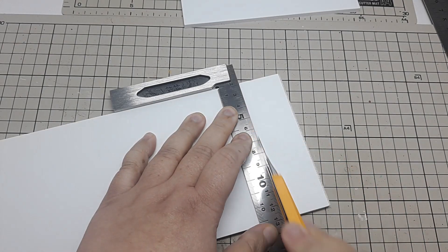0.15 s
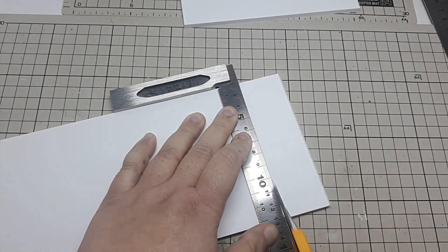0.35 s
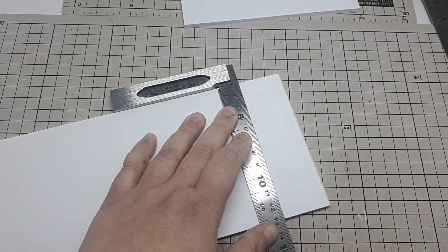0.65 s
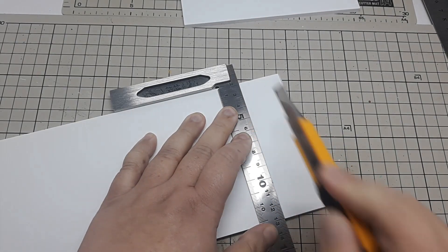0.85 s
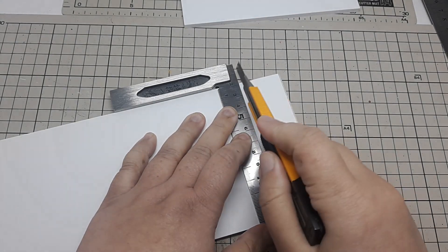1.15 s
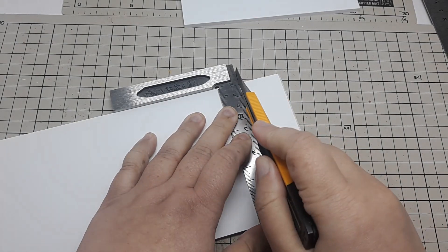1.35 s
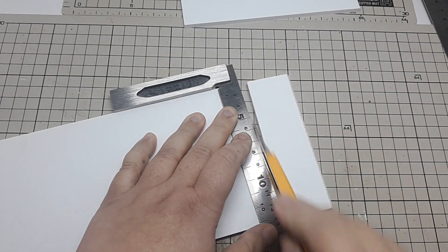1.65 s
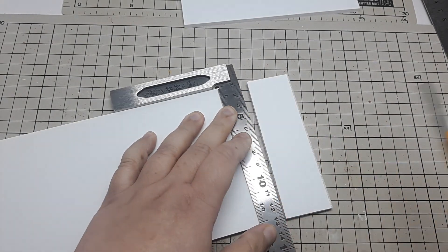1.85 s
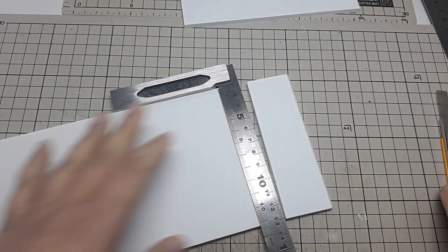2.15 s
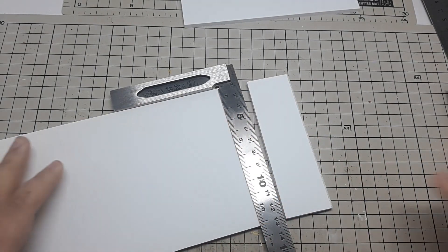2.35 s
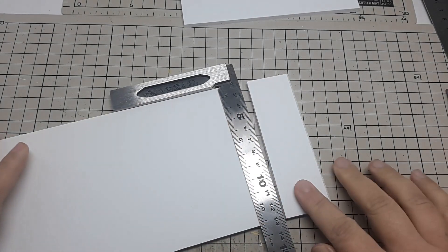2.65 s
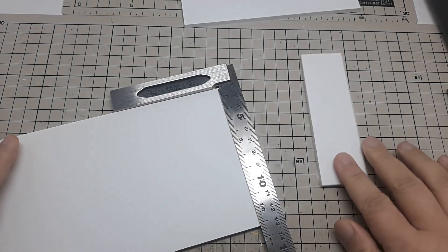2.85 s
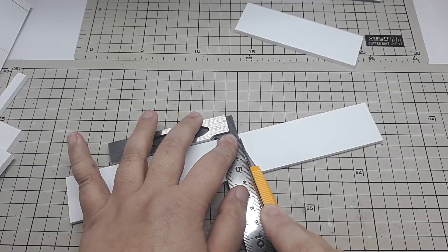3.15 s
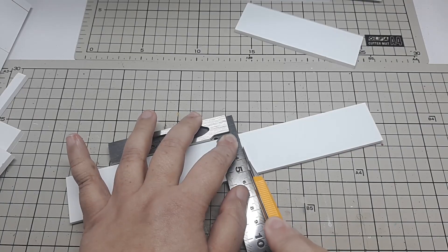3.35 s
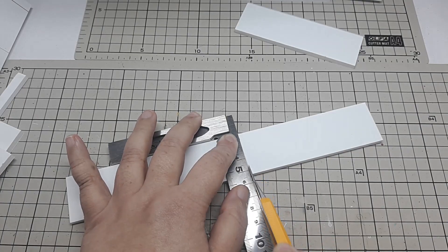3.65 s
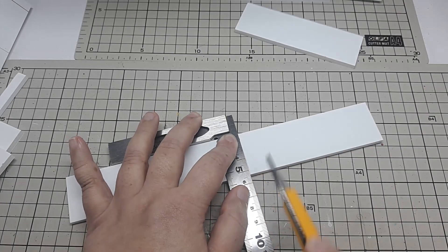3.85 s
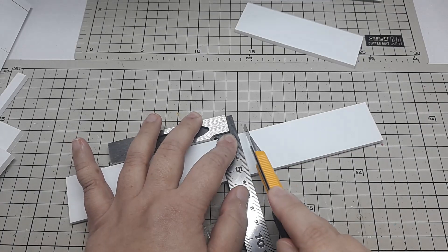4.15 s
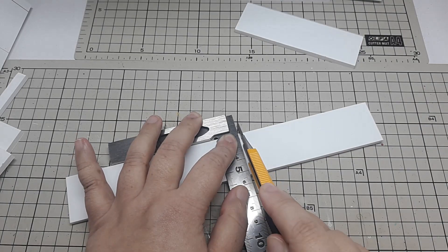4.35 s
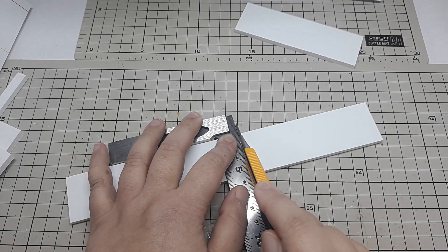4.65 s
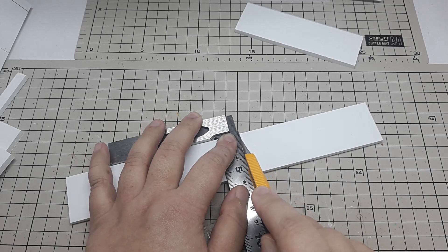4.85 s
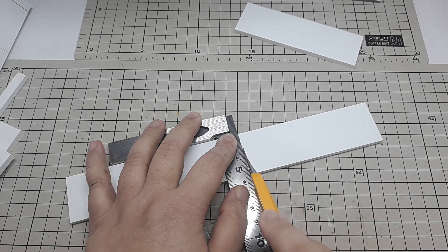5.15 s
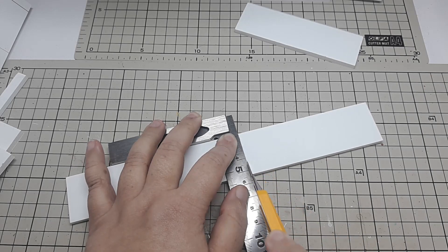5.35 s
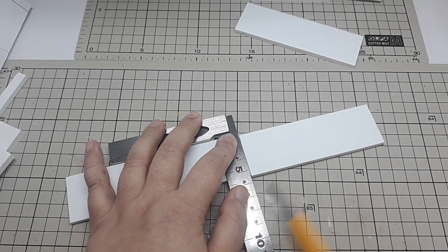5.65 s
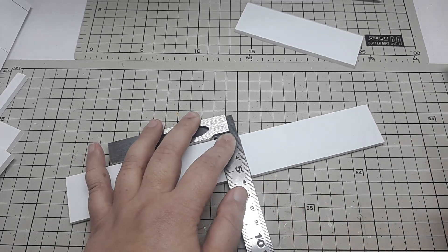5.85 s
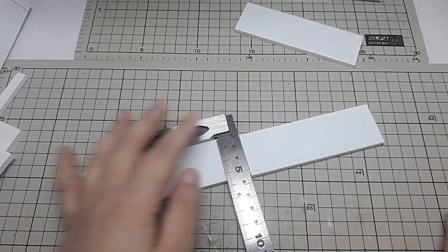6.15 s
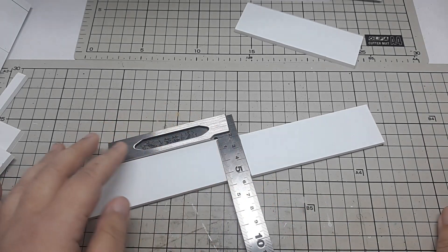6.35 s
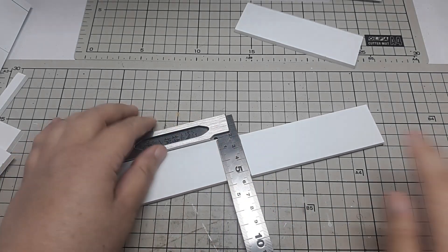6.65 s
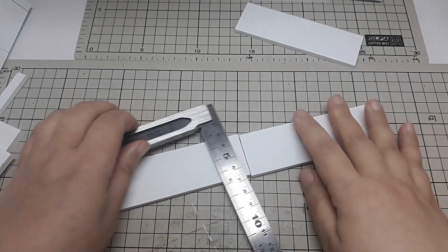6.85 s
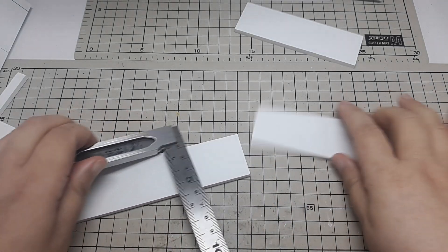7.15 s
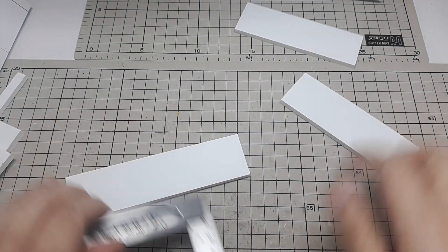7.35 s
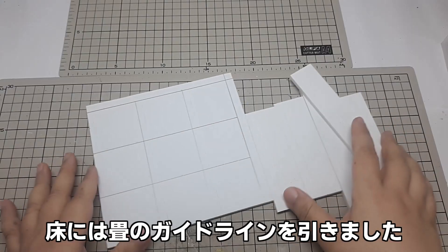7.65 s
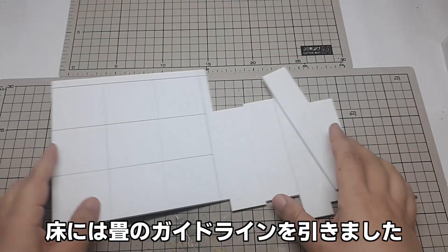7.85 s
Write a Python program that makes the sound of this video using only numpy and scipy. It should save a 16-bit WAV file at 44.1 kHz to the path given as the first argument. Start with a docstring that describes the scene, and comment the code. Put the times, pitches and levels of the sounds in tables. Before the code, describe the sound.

A blade drags through foam board against a metal square, first with a rough low-drumming scrape, then a short rip ending in a ringing snap. Knife and pieces knock the hollow table. Two thin fizzy cuts follow, the second juddering the table, and finally foam pieces rub and shuffle in a small quiet room, heard close.

```python
"""Foam board cut at a craft table

A utility knife cuts foam board along a steel square on a hollow craft table, close to a stereo microphone.
Strokes are noise shaped as tearing foam, with low noise that drums the board and rings the table top.
Knife, square and offcuts tick as short noise bursts, knock the table's decaying modes, and slide.
Behind them lie air and microphone hiss, a far machine's faint hum and the table murmuring under the hands.
"""
import sys
import numpy as np
from scipy import signal
from scipy.fft import rfft, irfft, next_fast_len
from scipy.io import wavfile
from scipy.ndimage import uniform_filter1d

SR = 44100
rng = np.random.default_rng(int(sys.argv[2]) if len(sys.argv) > 2 else 0)


def unload_audio(sound):
    """Save the sound as a 16-bit wav file, at the path given as the first command line argument."""
    columns = np.transpose(np.atleast_2d(sound))
    # keep every value between -1 and 1, then stretch to whole-number steps
    steps = np.round(np.clip(columns, -1, 1) * 32767)
    wavfile.write(sys.argv[1], SR, steps.astype(np.int16))


def volts_from_db(level):
    """Convert decibel levels to linear amplitude ratios."""
    exponent = np.asarray(level, float) / 20
    return 10 ** exponent


N = 352800  # 8 s


def evened(x):
    """Scales a sound to an rms of one."""
    return x / np.sqrt(np.mean(x ** 2) + 1e-20)


def read(points, hz):
    """Reads a curve of (f/Hz, value) along log frequency."""
    f, value = np.transpose(points)
    return np.interp(np.log(hz + 1), np.log(f + 1), value)


def add(mix, s, sound):
    """Lays a sound into the mix from s seconds on, cut at the end."""
    part = mix[:, round(s * SR):][:, :sound.shape[1]]
    part += sound[:, :part.shape[1]]


def colour(x, gain):
    """Filters x by gain(hz)."""
    size = next_fast_len(x.shape[-1])
    spectrum = rfft(x, size) * gain(np.fft.rfftfreq(size, 1 / SR))
    return irfft(spectrum, size)[..., :x.shape[-1]]


def above(hz, edge_hz, order=8):
    """Gain of a high-pass slope around edge_hz."""
    return 1 / np.sqrt(1 + (edge_hz / (hz + 1)) ** order)


def pair(size, same):
    """Two channels of white noise, alike by same(hz)."""
    a, b = rng.standard_normal((2, size))
    right = colour(a, same) + colour(b, lambda hz: np.sqrt(1 - same(hz) ** 2))
    return np.array([a, right])


def ring(modes, t):
    """Sums decaying sines, one for each mode (f/Hz, level/dB, t60/s)."""
    return sum(volts_from_db(db - 60 * t / t60) * np.sin(2 * np.pi * hz * t) for hz, db, t60 in modes)


def favour(modes, hz, reach_hz):
    """The place of a blow excites the modes nearest to hz most."""
    return [(f, db - 9 * min(abs(f - hz) / reach_hz, 2), t60) for f, db, t60 in modes]


def desk(x, near_db=-3.0, near_t60=0.012, far_db=-17, far_t60=0.24):
    """Each microphone hears the direct sound, close reflections off hands and tools, and a short room tail."""
    t = np.arange(6000) / SR
    taps = rng.standard_normal((2, len(t))) * (rng.random((2, len(t))) < .12)  # sparse reflections
    near = taps * volts_from_db(-60 * t / near_t60)
    far = taps * volts_from_db(-60 * t / far_t60)
    echo = volts_from_db(near_db) * near / np.linalg.norm(near[0]) + volts_from_db(far_db) * far / np.linalg.norm(far[0])
    echo[[0, 1], rng.integers(0, 6, 2)] += 1  # direct sound, up to 5 samples late on each side
    echo /= np.linalg.norm(echo, axis=1)[:, None]
    return signal.fftconvolve(x[None], echo, axes=1)


def moving(x, step_s=0.05):
    """As the hand travels, the reflections change: four paths fade into one another in turn."""
    turn = np.arange(len(x)) / SR / step_s
    out = 0
    for k in range(4):
        distance = abs((turn - k + 2) % 4 - 2)  # steps away from path k
        fade = np.cos(np.pi / 2 * np.clip(distance, 0, 1))
        out = out + desk(x * fade, near_t60=0.06, near_db=3.5)[:, :len(x) + 3000]
    return out


# board drumming under the blade: f/Hz, relative level/dB
BOARD_RUMBLE = [(160, -42), (280, -8), (346, -16), (448, -2.5), (527, -1), (781, -5.5), (867, -3.5),
                (1150, -6), (1500, -24.5), (1950, -47), (3300, -120)]


def stroke(rows, hiss, board_db, table_db):
    """Thousands of foam cells tear each second; the weight behind the drag drums the board and the table."""
    s, *columns = np.transpose(rows)
    t = np.arange(s[0] - .004, s[-1] + .004, 1 / SR)
    edges = np.sqrt(np.clip(np.minimum(t - t[0], t[-1] - t) / .008, 0, 1))  # 8 ms fades
    drag_db, fizz_db, weight_db = (np.interp(t, s, c) for c in columns)
    rumble = volts_from_db(weight_db + board_db) * edges
    shake = volts_from_db(weight_db + table_db) * edges

    def slow(width):
        return uniform_filter1d(rng.standard_normal(len(t)), width)

    grain_db, judder_db, stutter_db = 3.5, 0.06, 2.5
    cells = rng.standard_normal(len(t)) * volts_from_db(grain_db * np.minimum(rng.exponential(1, len(t)), 4))
    cells *= volts_from_db(judder_db * evened(slow(300)))  # the blade sticks and slips

    def high(hz):
        return above(hz, 9000, order=16)

    scrape = evened(colour(cells, lambda hz: volts_from_db(read(hiss, hz)) * (1 - high(hz))))
    tearing = evened(colour(cells, lambda hz: volts_from_db(read(hiss, hz)) * high(hz)))
    out = moving(volts_from_db(drag_db) * edges * (scrape + volts_from_db(fizz_db) * tearing))

    # board and table share one low drag noise, most alike left and right in the bass
    drag = pair(len(t) + 4000, lambda hz: np.clip(.98 - hz / 1500, 0, 1))
    drumming = evened(colour(drag, lambda hz: volts_from_db(read(BOARD_RUMBLE, hz))))[:, 4000:]
    out[:, :len(t)] += rumble * drumming
    shake = shake * volts_from_db(stutter_db * evened(uniform_filter1d(slow(400), 400)))
    top = ring([(178, 7, 0.063), (80, -33.0, 0.056)], np.arange(4000) / SR)
    shaking = signal.fftconvolve(drag, top[None], "valid", axes=1)[:, :len(t)]
    out[:, :len(t)] += shake * evened(shaking)
    return max(t[0], 0), out


# one list a loud stroke (two cuts, with a slide between them): t/s, drag level/dB, fizz of tearing cells over
# the drag/dB, # weight level/dB before it is shared between board and table (so for every stroke below)
LOUD_STROKES = [
    [(0.0, -54.5, 3, -51), (0.042, -55, -1, -49), (0.19, -53.5, 2.5, -47), (0.222, -49.5, 0, -49.5),
     (0.264, -49.5, -1.5, -47), (0.508, -53, -6.5, -52), (0.514, -46, -2, -48)],
    [(0.527, -50, -5, -50), (0.541, -53, -10, -44), (0.595, -51, -16, -50), (0.641, -68, -5, -56),
     (0.655, -67, -14, -57), (0.67, -56, -8, -53)],
    [(1.535, -49, -10, -46), (1.553, -58, -7, -53), (1.607, -55.5, -2, -53.5), (1.643, -50, -7, -50),
     (1.681, -50.5, -4, -49.5), (1.699, -50.5, -8, -54), (1.72, -46, -17, -48.5)],
]
# their hiss: f/Hz, relative level/dB
LOUD_HISS = [(760, -19.5), (1300, -3.5), (1870, -4.5), (2100, 2), (2330, -4.5), (3280, -3.5), (4530, -0.5),
             (7850, -9), (11900, -10), (13900, -8), (15600, -14.5)]


def loud_strokes():
    """Loud, duller cuts and a slide between them, their weight mostly drumming the board."""
    return [stroke(rows, LOUD_HISS, board_db=-2.7, table_db=-6) for rows in LOUD_STROKES]


# one list a quieter cut: t/s, drag level/dB, fizz over the drag/dB, weight level/dB
BRIGHT_CUTS = [
    [(2.98, -67.5, 2.5, -68.5), (3.334, -64.5, 6.5, -63.5), (3.522, -62, 7.5, -64.5),
     (3.726, -61, 5.5, -59), (3.748, -56, -11, -56), (3.76, -63, -11, -64), (3.784, -64, -10, -64),
     (3.796, -50.5, -5, -59.5), (3.82, -86, -2, -70)],
    [(4.74, -85, 3.5, -89), (4.766, -73, 12, -69), (4.816, -66.5, 9.5, -62.5), (4.882, -70, 11.5, -59.5),
     (4.912, -72, 4, -70), (4.948, -64.5, 9, -59.5), (5.354, -59.5, -3, -60.5), (5.416, -57, 13, -60),
     (5.42, -51, -3, -47)],
]
# their hiss: f/Hz, relative level/dB
BRIGHT_HISS = [(760, -15), (1300, -18), (1410, -6), (1540, -3), (1910, -8.5), (3250, -7.5), (4670, -3),
               (6580, -6), (7770, -7.5), (10200, -5), (12000, 1.5), (14000, 4), (15600, -2.5)]


def bright_cuts():
    """Quieter cuts with a brighter hiss, their weight shaking the table more than the board."""
    return [stroke(rows, BRIGHT_HISS, board_db=0, table_db=2.7) for rows in BRIGHT_CUTS]


# one list a pull: t/s, drag level/dB, fizz over the drag/dB, weight level/dB
PULLS = [
    [(6.845, -58, -1, -58), (6.855, -61, -9, -70), (6.883, -59.5, 4, -69), (6.937, -56, 5, -72),
     (6.949, -56, 7, -64), (7.043, -60.5, 4, -73), (7.057, -48, 1, -62), (7.083, -54.5, 2, -64),
     (7.125, -51, -4, -67), (7.153, -51, 7.5, -68), (7.185, -58.5, 11, -77), (7.217, -45, 11.5, -65),
     (7.227, -51.5, 2, -54), (7.26, -74, 3, -65)],
]
# its hiss: f/Hz, relative level/dB
PULL_HISS = [(760, -22.5), (1300, -14.5), (1570, -17), (1780, -10), (3380, -13), (4480, -14), (4920, -16.5),
             (5930, -12), (7850, -13.5), (10200, -9), (11000, -0.5), (12000, -7), (15600, -10)]


def pulls():
    """A pulled stroke whose hiss peaks near 11 kHz."""
    return [stroke(rows, PULL_HISS, board_db=0, table_db=-6) for rows in PULLS]


# one list a slide: t/s, drag level/dB, fizz over the drag/dB, weight level/dB
SLIDES = [
    [(1.74, -50, -4, -54), (1.762, -71, -6, -77), (1.782, -75, -3, -83), (1.796, -66, 9, -81),
     (1.815, -73, 1, -63)],
    [(1.86, -64, 7, -66), (1.928, -71, -6, -72), (2.044, -75.5, 3, -88), (2.116, -64.5, -8, -75),
     (2.13, -75, -6, -66)],
    [(2.71, -53.5, 0, -55.5), (2.786, -56.5, 7, -62), (2.81, -57, 1, -64), (2.82, -59, 5, -47),
     (2.84, -71, 3, -58)],
    [(6.465, -60, -12.5, -48.5), (6.487, -63, -17.5, -62), (6.495, -64, -12, -56), (6.51, -66, -16, -56.5)],
    [(6.575, -68, -9, -62), (6.617, -64, 2, -76), (6.717, -62, -7, -63.5), (6.799, -65, 6, -70),
     (6.82, -52, -5, -71)],
    [(7.26, -66, 0, -64), (7.284, -68, 1, -85), (7.302, -66.5, 1, -79), (7.372, -71, 3, -78),
     (7.4, -88, -16, -71)],
    [(7.6, -72, -8, -68.5), (7.606, -62, 2, -68.5), (7.652, -58, 4, -62.5), (7.732, -64, -4, -74),
     (7.76, -61, 1, -71)],
    [(7.76, -56.5, -6, -70), (7.868, -47, -0.5, -58.5), (7.914, -49, -3, -64.5), (7.96, -65, -2, -69),
     (7.965, -46, -2, -54)],
]
# hiss of slides and scuffs: f/Hz, relative level/dB
SLIDE_HISS = [(760, -13), (1300, -5.5), (2100, -2.5), (2690, -4.5), (3250, -4), (5630, -4.5), (7150, -8.5),
              (15600, -6)]


def slide(rows):
    """Knife, square or offcut slides: drag noise with little table shake."""
    return stroke(rows, SLIDE_HISS, board_db=0, table_db=-8)


# brief rubs that swell and fade: t/s of the peak, rise/s, fall/s, drag level/dB, fizz over it/dB
SCUFFS = [(.7, 0.034, 0.0224, -49, 0), (1.518, 0.076, 0.0052, -61, 7), (2.365, 0.0025, 0.033, -44, -10),
          (2.405, 0.0029, 0.028, -43, 0), (2.594, .04, 0.14, -63, 0), (2.85, .004, .04, -58, -2),
          (2.912, .025, .004, -47, -13), (2.925, 0.0033, 0.056, -45.5, 2.5), (4.126, 0.0055, 0.056, -72, 5),
          (5.43, 0.0036, .05, -50, 0), (5.56, 0.063, 0.2, -67, -12), (5.646, 0.041, 0.032, -52, -8),
          (6.138, 0.053, 0.079, -66, -7.5), (6.27, 0.12, 0.093, -66, 1), (7.975, 0.0054, 0.043, -46, -2)]


def scuff(s, rise, fall, db, fizz_db):
    """A light slide with one peak, its weight following the drag."""
    ends_db, weight_db = -24.5, -2  # relative to the peak; relative to the drag
    shape = (-rise, ends_db), (0, 0), (fall, ends_db)
    return slide([(s + dt, db + end_db, fizz_db, db + end_db + weight_db) for dt, end_db in shape])


# the blade snapping free of the cut: f/Hz, relative level/dB, t60/s
BLADE = [(7090, 2, 0.045), (8400, -19, 0.05), (13400, -15, 0.04), (14030, -14, 0.04), (14780, -37, 0.27)]


def blade_snap():
    """The freed blade rings in high modes, strongest at the onset."""
    t = np.arange(8000) / SR
    onset = np.minimum(t / 0.0024, 1) * (1 + 6 * np.exp(-t / 0.0055))
    return 1.7255, volts_from_db(-28) * desk(ring(BLADE, t) * onset, near_db=-1.5)


# the offcut coming free: f/Hz, relative level/dB, t60/s
SQUEAK = [(1570, 6.5, 0.049), (4495, -4, 0.057)]


def offcut_squeak():
    """The freed offcut squeaks in two short decaying modes."""
    t = np.arange(8000) / SR
    return 7.214, volts_from_db(-38.5) * desk(ring(SQUEAK, t) * np.minimum(t / 0.011, 1), near_db=-6)


# hard contacts of blade, square and foam edges: t/s, level/dB (before a 10 dB trim),
# gain of the bright edge/dB, centre f/Hz, left over right/dB (before the echoes' own lean)
TICKS = [(0.194, -29, 6, 4590, 1.0), (0.5169, -23, -15, 1600, 1.5), (0.6304, -44.5, -5, 3510, 3),
         (0.6666, -42, -8, 2400, -1.5), (0.6914, -31, -9, 5710, -1.0), (0.6982, -22.5, 0, 5150, 1.5),
         (0.8935, -43.5, -18, 4160, 4), (0.9068, -44, -20, 4100, 1.5), (1.3497, -52, -37.5, 1650, 2.0),
         (1.5238, -20.5, -4.5, 3660, 0.5), (1.7272, -14.5, 2, 7050, 4.5), (1.79, -36.5, -2, 6980, 1),
         (1.823, -35.5, -28, 1550, 5), (1.8709, -41.5, 6, 5460, 2.0), (1.9155, -36.5, 2, 5170, 6),
         (1.931, -37, 3, 6660, 1), (1.967, -44, -3, 2614, 0.5), (1.9847, -41, -5, 2150, 0.0),
         (2.147, -6.5, -12, 2320, -0.5), (2.1615, -23.5, -13, 2080, 4), (2.3142, -35, -13, 2270, -1.5),
         (2.3557, -18.5, -8, 1720, 3), (2.39, -35, -9.5, 4380, -3.5), (2.4003, -21.5, -7.5, 1690, -1.0),
         (2.4233, -34, -13, 5380, -4), (2.5962, -45, -23, 1400, 3), (2.698, -25, -4.5, 2700, 1),
         (2.8469, -32.5, -8, 1470, -5), (2.897, -43, -1, 1940, -3.5), (2.9173, -21, -1.5, 6300, 0.0),
         (3.793, -33.5, -9, 5130, -0.5), (4.5046, -29, -3.5, 5270, -1), (5.4235, -23.5, -2, 7180, -3),
         (5.6356, -38, -12, 5720, 1.5), (5.6434, -33.5, -5, 5980, 3), (5.6574, -35, -3, 5010, -1),
         (5.7738, -45.5, -4, 1558, -1.5), (5.9388, -53, -4, 1700, -0.5), (6.0003, -47.5, 2.5, 2640, 3),
         (6.0561, -54, -6.5, 7770, -1), (6.0731, -49, -2, 6800, 2), (6.4528, -33, -23, 1730, -2.5),
         (6.5283, -33, -10, 1670, -4), (6.545, -39, -20, 1720, -4.5), (6.5562, -34, -16, 7760, 6),
         (6.5613, -23, -5.5, 7750, -2), (6.622, -29.5, -8, 6000, -1.5), (6.6674, -37.5, -10, 4590, -1.5),
         (6.8254, -32, -16, 2040, 3), (6.8354, -29.5, 2, 2120, 2.5), (7.2413, -36, -5, 6560, 0.0),
         (7.6092, -45.5, -7, 3420, 2), (7.6533, -33.5, -7, 2020, 3), (7.9698, -27.5, -13, 1630, 2.5),
         (7.9819, -38, -6, 2430, 0.5)]


def tick(s, db, top_db, centre_hz, pan_db):
    """A short crackle: it swells within a few milliseconds, with a broad resonance and a bright edge."""
    u = np.arange(2500) / SR / 0.017  # time in units of the 17 ms t60
    swell = np.minimum(u / 0.23, 1) ** 2
    burst = np.pad(rng.standard_normal(len(u)) * swell * volts_from_db(-60 * u), (40, 0))

    def gain(hz):
        body = 0.54 + 1 / np.sqrt(1 + ((hz - centre_hz) / (0.045 * centre_hz)) ** 2)
        bright = above(hz, 5800) * volts_from_db(top_db)
        return above(hz, 1400, order=4) * (body * (1 - above(hz, 8000)) + bright)

    sound = desk(colour(burst, gain))
    loudest = np.sqrt(uniform_filter1d((sound ** 2).mean(0), 90).max())  # rms of the loudest 2 ms
    sides_db = np.array([[.5], [-.5]]) * pan_db
    return s - .002, sound / loudest * volts_from_db(db - 10.0 + sides_db)


# modes of the table top in four groups, low to high: f/Hz, relative level/dB, t60/s
TABLE = [
    [(188, 4.5, 0.1566), (163.5, -1.5, 0.14), (116, -6.5, 0.089), (83, -8.5, 0.21)],
    [(272.5, -5.5, 0.0097), (298.6, -2.5, 0.11), (321.2, 1, 0.13), (349.5, -2.5, 0.082)],
    [(414, -1.5, 0.11), (473.6, 1, 0.076), (505.7, -10.5, 0.13), (595, 4, 0.044), (705, 1.5, 0.036)],
    [(866, -2, 0.035), (924, 0.5, 0.031), (1070, 0.5, 0.054), (1220.6, 4.5, 0.02)],
]
# blows into the table top: t/s, strength level/dB, depth (lift of the lowest group)/dB,
# hardness (lift of the puff and the two upper groups)/dB, favoured f/Hz
KNOCKS = [(0.521, -48.5, 7, 12.5, 576), (0.542, -49.5, -20, 10, 519), (0.681, -56, -7, 11.5, 616),
          (1.131, -56.5, -10, -3, 953), (1.18, -55.5, 1, -7, 452), (1.346, -54, -4, 5, 510),
          (1.521, -41, -2.5, -2, 455), (1.722, -47.5, -14, 4, 1100), (1.824, -26.5, -7.5, -4, 471),
          (2.151, -23.5, -9, 9, 666), (2.164, -26.5, 0.5, -9, 474), (2.315, -43, -1.5, 8, 890),
          (2.358, -22, -11, -4, 509), (2.396, -28.5, -9.5, -3, 401), (2.423, -34.5, -11, -10.5, 500),
          (2.596, -45.5, 10, 0.5, 439), (2.682, -49.5, 16, 8.5, 404), (2.815, -53, -5, 16, 1100),
          (2.848, -47.5, -12.5, 12, 610), (2.862, -41.5, -4, 13, 756), (2.917, -40.5, 11.5, 9.5, 920),
          (3.789, -50.5, -12, 0.5, 595), (4.125, -59.5, -1, -10.5, 538), (4.505, -60.5, 7, 5, 529),
          (5.425, -49, 13, 7.5, 430), (5.634, -54.5, -6, 6, 490), (6.454, -41.5, -16, -8, 392),
          (6.528, -34, -19.5, -9, 401), (6.558, -37, -17, -7, 425), (6.665, -55, -1, -7, 514),
          (6.697, -43, -16, -3, 482), (6.825, -43, 1.5, 10.5, 600), (7.23, -51.5, -21, -2, 455),
          (7.66, -54, -13, 1.5, 493), (7.973, -47.5, -19, -5, 445)]


def knock(s, strength_db, depth_db, hard_db, hz):
    """A soft push rings the table, each mode a little different left and right; a dull puff fills between them."""
    t = np.arange(12000) / SR
    noise = pair(len(t), lambda hz: 0.4 + 0 * hz)
    puff = colour(noise, lambda hz: above(hz, 170, order=4) / (1 + (hz / 1500) ** 2))
    decay = volts_from_db(-60 * t / 0.099) * np.minimum(t / 0.0099, 1)
    sound = volts_from_db(strength_db + hard_db - 9.5) * evened(puff) * decay
    groups = TABLE[0], TABLE[1], favour(TABLE[2], hz, 250), favour(TABLE[3], hz, 380)
    levels_db = strength_db + np.array([depth_db - 4, -3, hard_db - 2.5, hard_db + 1.0])
    for modes, db, spread_db in zip(groups, levels_db, (1.5, 2.5, 3.5, 4.5)):
        for f, mode_db, t60 in modes:
            chance, lean, lag = rng.uniform(-1.4, 1, size=3)
            mode = ring([(f, db + mode_db + spread_db * chance, t60)], t) * np.minimum(t / 0.0016, 1)
            shift = round(6 * lag)  # samples, opposite ways left and right
            sides = np.array([np.roll(mode, shift), np.roll(mode, -shift)])
            sound += volts_from_db(spread_db * lean * np.array([[.5], [-.5]])) * sides
    return s - .001, sound


# the blade or a hand catches and lets go, jolting the table:
# t/s, level/dB (before a 5.5 dB lift), favoured f/Hz among the low modes
JOLTS = [(0.268, -41, 187), (1.225, -52, 188), (1.627, -46, 167), (3.194, -45, 167), (3.229, -54, 188),
         (3.308, -54, 167), (3.369, -51.5, 145), (3.529, -54, 191), (3.743, -36, 163.5), (3.899, -58, 190),
         (4.376, -52.5, 178), (4.762, -50, 178), (4.93, -42, 162), (4.985, -44, 188.9), (5.04, -42.5, 168),
         (5.09, -36.5, 147), (5.141, -38.5, 164), (5.189, -56, 143), (5.244, -35.5, 156), (5.303, -39, 173),
         (5.331, -39, 182.5), (5.389, -40, 164), (5.78, -66.5, 218), (6.535, -45, 125), (6.774, -48.5, 183),
         (6.83, -40, 110), (7.02, -56, 180), (7.1, -57, 160)]


def jolt(s, db, hz):
    """A slower push that reaches only the low modes."""
    t = np.arange(9000) / SR
    push = np.minimum(t / 0.02, 1) * volts_from_db(-60 * t / 0.27)
    mode = volts_from_db(db + 5.5) * ring(favour(TABLE[0], hz, 30), t) * push
    return s - .003, np.array([mode, mode])


# hands resting and shifting on the table: t/s, level/dB
STIR = [(0.0, -51), (0.38, -55), (0.71, -67), (1.23, -72), (1.76, -59), (1.89, -64.5), (2.18, -64),
        (2.32, -58.5), (3.65, -59.5), (3.83, -65), (4.1, -74), (4.81, -71.5), (4.94, -60), (5.24, -56.5),
        (5.61, -68), (6.24, -77), (6.51, -66), (6.64, -60), (7.24, -68), (8.0, -68)]


def table_murmur():
    """Steady noise rings the lower table modes, rising and falling with the hands."""
    t = np.arange(N) / SR
    top = ring(TABLE[0] + TABLE[1], np.arange(8000) / SR)
    murmur = signal.fftconvolve(pair(N, lambda hz: 0.79 + 0 * hz), top[None], axes=1)[:, :N]
    return volts_from_db(np.interp(t, *np.transpose(STIR))) * evened(murmur)


# a far machine: t/s, f/Hz, level/dB
HUM = [(2.97, 523, -90), (3.099, 525, -80), (7.35, 525, -76), (7.449, 522, -100)]


def far_machine():
    """One sine of drifting pitch and wavering level, the same left and right."""
    t = np.arange(N) / SR
    s, hz, db = np.transpose(HUM)
    waver = volts_from_db(1.1 * evened(uniform_filter1d(rng.standard_normal(N), 3000)))
    phase = 2 * np.pi * np.cumsum(np.interp(t, s, hz)) / SR
    return volts_from_db(np.interp(t, s, db, -120, -120)) * waver * np.sin(phase)


# air and microphone hiss: f/Hz, relative level/dB
AIR = [(12, -32.5), (20, 7), (30, -19), (49, -16), (109, -27), (191, -10.5), (352, -24.5), (519, -15.5),
       (581, -22), (834, -23), (3000, -28), (9390, -39), (15500, -40)]
# its left-right likeness: f/Hz, correlation (values below 0 count as 0)
SAME = [(60, 0.15), (240, -0.036), (950, 0.018), (3770, -0.07), (15000, -0.02)]


def air():
    """Steady coloured noise, nearly independent in the two channels."""
    hiss = pair(N, lambda hz: np.clip(read(SAME, hz), 0, 1))
    return volts_from_db(-65) * evened(colour(hiss, lambda hz: volts_from_db(read(AIR, hz))))


def scene():
    """Lays every stroke, contact and blow over the quiet room."""
    mix = air() + far_machine() + table_murmur()
    strokes = loud_strokes() + bright_cuts() + pulls() + [slide(rows) for rows in SLIDES]
    for s, sound in strokes + [blade_snap(), offcut_squeak()]:
        add(mix, s, sound)
    for rows, hit in ((SCUFFS, scuff), (TICKS, tick), (KNOCKS, knock), (JOLTS, jolt)):
        for row in rows:
            add(mix, *hit(*row))
    return mix


def low_pass(x):
    """Removes everything above the highest recorded frequency."""
    return signal.sosfilt(signal.butter(12, 16680, fs=SR, output="sos"), x)


def record(dry):
    """A low cut thins the deepest bass; a steep band limit removes everything above about 15.9 kHz."""
    def response(hz):
        low_cut = (0.13 + above(hz, 84, order=6)) / 1.069
        band_limit = 1 - above(hz, 15850, order=300)
        return low_cut * band_limit

    shaped = colour(dry, response)
    return low_pass(shaped)


dry = scene()
out = record(dry)
unload_audio(out)
```